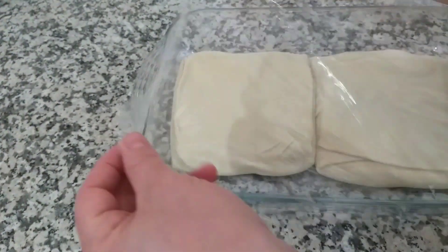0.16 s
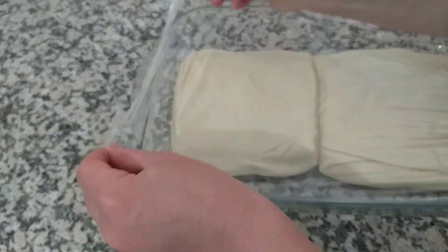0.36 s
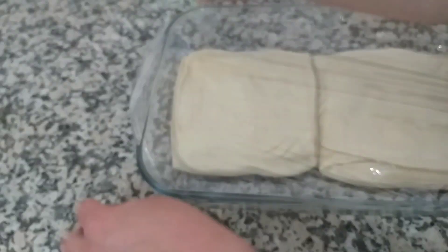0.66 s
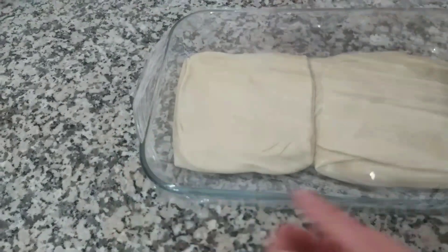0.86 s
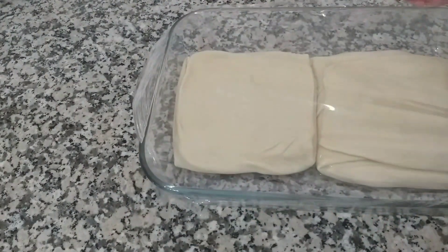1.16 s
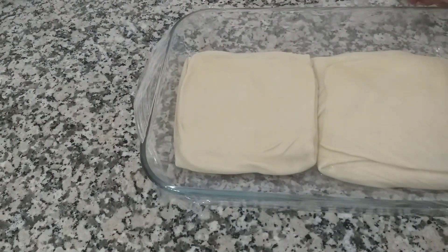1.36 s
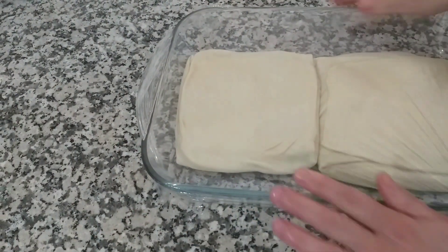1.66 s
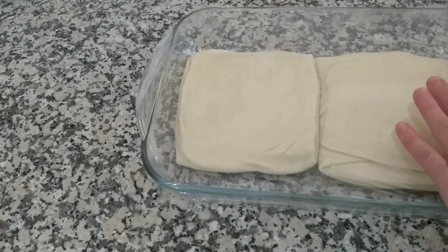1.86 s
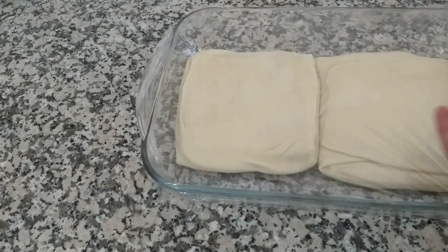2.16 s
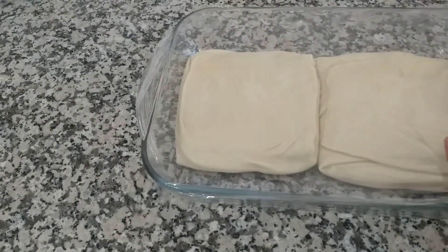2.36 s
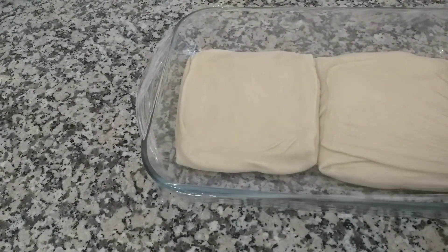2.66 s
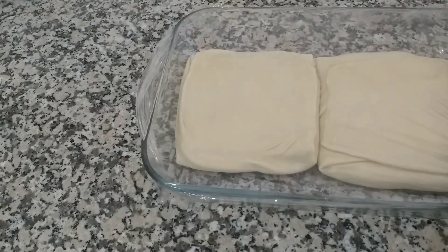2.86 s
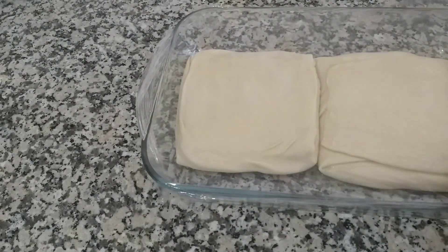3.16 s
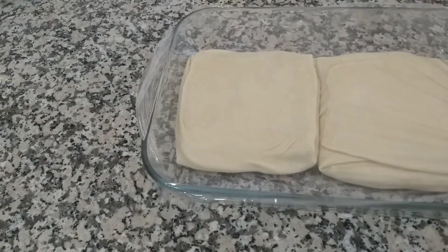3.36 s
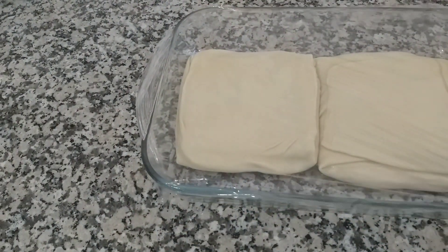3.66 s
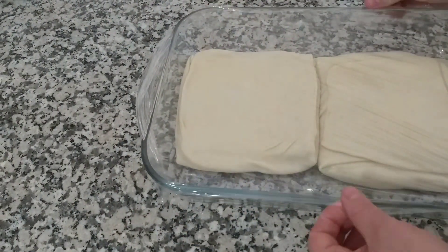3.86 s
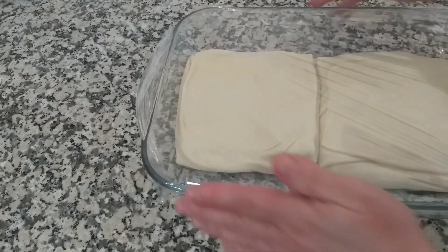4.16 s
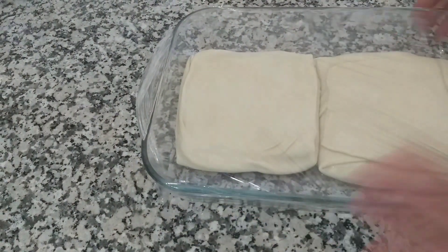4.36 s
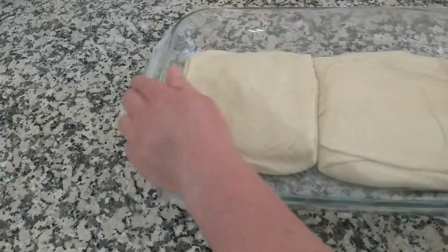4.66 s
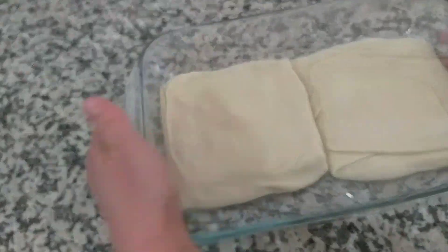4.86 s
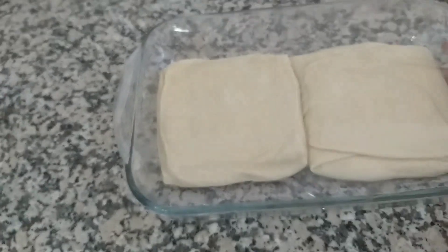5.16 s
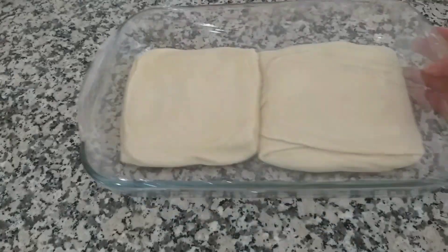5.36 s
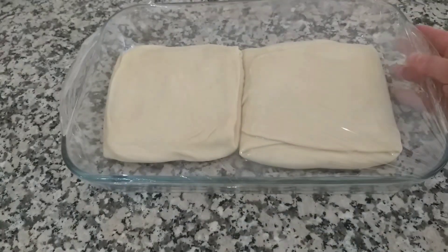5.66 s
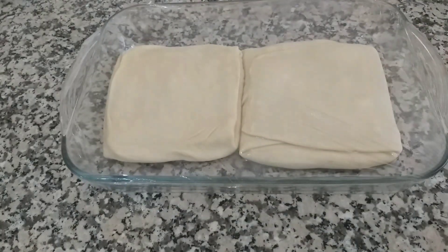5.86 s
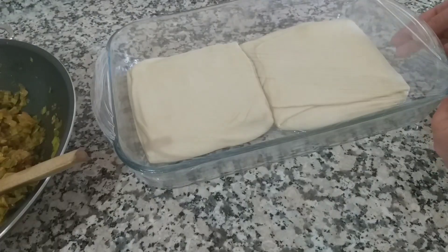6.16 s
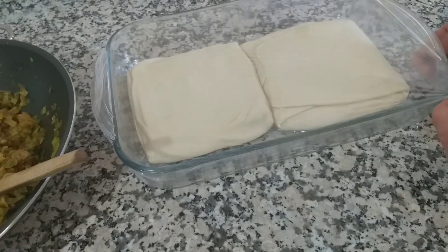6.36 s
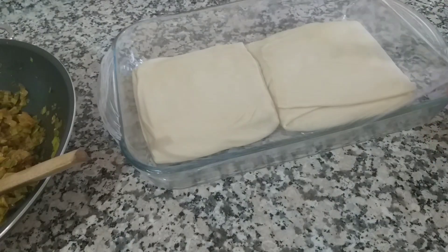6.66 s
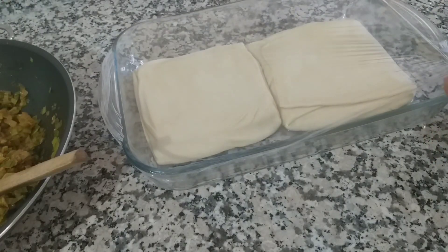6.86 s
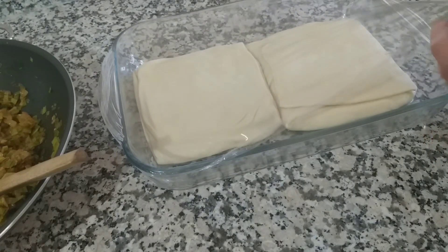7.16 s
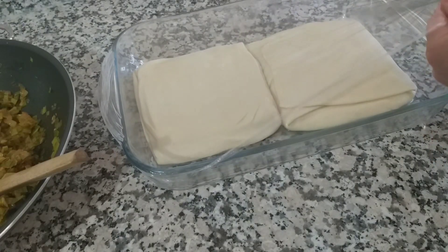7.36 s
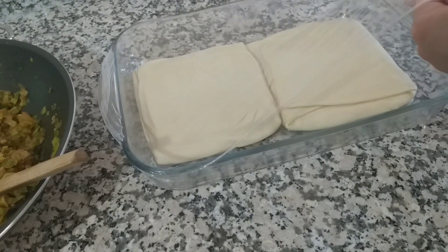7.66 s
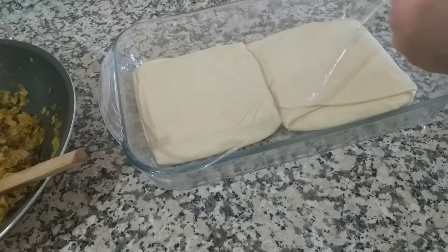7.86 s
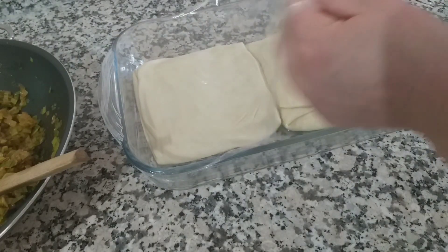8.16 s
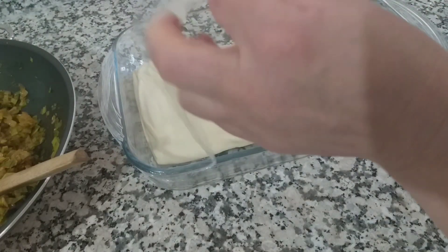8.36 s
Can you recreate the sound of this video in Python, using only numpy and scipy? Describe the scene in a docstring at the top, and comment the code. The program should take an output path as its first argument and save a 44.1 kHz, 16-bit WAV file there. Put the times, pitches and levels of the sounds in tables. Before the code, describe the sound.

Close up in a small quiet kitchen, cling film crackles in short uneven bursts with soft dull pats, sharpest just before three seconds. It thins out to faint ticking, a glass dish slides with a low rumble on stone, then after a tiny dropout two longer pulls crackle brightly over a low hum. Nearly mono, very little echo.

```python
"""A small, quiet kitchen with a stone counter, heard close up and almost in mono: cling film is stretched
over a glass dish of dough and pressed down by hand. Creases buckle as ringing impulses, the sheet rustles
as dense random grains, taut panels and pats sound as damped noise resonances, wipes as swells of crackle.
The dish slides as band-limited friction noise; room air is coloured noise, joined late by a low drone."""
import sys
import numpy as np
from scipy import signal
from scipy.fft import rfft, irfft, next_fast_len
from scipy.io import wavfile
from scipy.ndimage import uniform_filter1d

SR = 44100
rng = np.random.default_rng(int(sys.argv[2]) if len(sys.argv) > 2 else 0)


def master_out(mix):
    """Clip the mix to full scale and print it as 16-bit PCM to the path in sys.argv[1]."""
    frames = np.transpose(np.atleast_2d(mix))
    ceiling = np.clip(frames, -1, 1)
    pcm = np.round(ceiling * 32767).astype(np.int16)
    wavfile.write(sys.argv[1], SR, pcm)


N = 375291
TIME = np.arange(N) / SR
GAP_START, GAP_END = 5.992, 6.026  # s, a short silence
CUTOFF_HZ = 16100


def from_db(db):
    """Level to amplitude: 20 dB is a factor of ten."""
    return 10 ** (np.asarray(db) / 20)


def rms_one(x):
    """Normalisation: scale to an effective value of one."""
    return x / np.sqrt(np.mean(x ** 2) + 1e-20)


def in_time(rows):
    """Linear interpolation: join each column of a curve by straight lines over time."""
    times, *columns = np.transpose(rows)
    return [np.interp(TIME, times, column) for column in columns]


def band(x, low, high, order=2):
    """Band limitation: a Butterworth band-pass filter."""
    return signal.sosfilt(signal.butter(order, [low, high], "band", fs=SR, output="sos"), x)


def peak_at(x, hz, q):
    """Resonance: a narrow band-pass filter of quality factor q."""
    return signal.lfilter(*signal.iirpeak(hz, q, fs=SR), x)


def coloured(x, points, size=2048):
    """Minimum phase: a folded cepstrum turns a magnitude spectrum into a causal filter."""
    hz, db = np.transpose(points)
    grid = np.maximum(np.fft.rfftfreq(size, 1 / SR), 1)
    spectrum = from_db(np.interp(np.log(grid), np.log(hz), db))
    cepstrum = irfft(np.log(spectrum))
    cepstrum[1:size // 2] *= 2
    cepstrum[size // 2 + 1:] = 0
    response = irfft(np.exp(rfft(cepstrum)))
    return signal.fftconvolve(x, response)[:len(x)]


def drift(rate):
    """Random modulation: normal deviates, rate per second, joined by lines and scaled to rms 1."""
    knots = rng.standard_normal(int(N / SR * rate) + 2)
    return rms_one(np.interp(TIME * rate, np.arange(len(knots)), knots))


def add(out, s, sound):
    """Superposition: add a sound that starts at s seconds."""
    start = max(int(s * SR), 0)
    out[start:start + len(sound)] += sound[:N - start]


# room air over time, with a brief dip: t/s, level/dB
AIR_LEVEL = [(0, -72), (2.7, -71), (3.0, -77), (3.3, -73.5), (5.9, -72), (6.1, -70), (8.5, -70)]
# relative spectrum of room air: f/Hz, level/dB
AIR_SPECTRUM = [(18, -36.5), (30, -6), (138, 2.5), (221, -5.5), (632, -12.5), (801, -17.5), (988, -18),
                (1250, -22), (1590, -13.5), (2060, -20.5), (7090, -20.5), (9970, -31), (14400, -24.5),
                (16000, -31.5)]


def room_air():
    """Stationary noise: a fixed spectrum whose level drifts slightly."""
    air = rms_one(coloured(rng.standard_normal(N), AIR_SPECTRUM))
    return from_db(in_time(AIR_LEVEL)[0]) * air


# lines of a low appliance drone: f/Hz, rms level before the common trim/dB
DRONE_LINES = [(70.0, -76), (102.3, -75.5), (134.6, -109.5)]
# relative spectrum of the drone's noise: f/Hz, level/dB
DRONE_SPECTRUM = [(50, -12), (100, -2), (170, -9.5), (300, 14.5), (450, -24), (1000, -6), (3000, -4.5)]


def drone(noise_db=-74, lines_db=-1):
    """Phase modulation: wavering sine lines over low noise, entering with the short silence."""
    sound = from_db(noise_db) * rms_one(coloured(rng.standard_normal(N), DRONE_SPECTRUM))
    for hz, db in DRONE_LINES:
        phase = 2 * np.pi * hz * TIME + .4 * drift(1.8)
        sound += from_db(db + lines_db) * np.sqrt(2) * np.sin(phase)
    return sound * (TIME > GAP_START)


def kitchen(x, wet_db, t60=0.085, wall_hz=6000, delay_s=.004, size=14000):
    """Reverberation: counter, walls and cupboards return a short, duller, exponentially decaying tail."""
    t = TIME[:size]
    build_up = 1 - np.exp(-(t / delay_s) ** 2)
    tail = rng.standard_normal(size) * from_db(-60 * t / t60) * build_up
    tail = signal.lfilter(*signal.butter(1, wall_hz, fs=SR), tail)
    tail /= np.sqrt(np.sum(tail ** 2))
    return x + from_db(wet_db) * signal.fftconvolve(x, tail)[:N]


# the dish slides on the counter: t/s, level of the lower rumble/dB
SLIDE_LEVEL = [(5.12, -83.5), (5.19, -63.5), (5.33, -62), (5.45, -72.5), (5.65, -85), (5.78, -67),
               (5.91, -68.5), (6.02, -94)]


def slide(upper_db=-12, grit_db=-12):
    """Friction excitation: glass on stone rumbles in two low resonances under a faint gritty scrape."""
    friction = rng.standard_normal(N)
    level = from_db(in_time(SLIDE_LEVEL)[0])
    rumble = rms_one(band(friction, 110, 120)) + from_db(upper_db) * rms_one(band(friction, 275, 350))
    # the scrape varies less than the rumble
    smooth_level = uniform_filter1d(level, size=16000)
    scrape = from_db(grit_db) * rms_one(band(friction, 1430, 1900)) * smooth_level
    return level * rumble + scrape


def soft_blows(rows, level_db, rise_s, width, size=12000):
    """Damped resonance: each push is a noise burst in one band; width is the ratio of edge to centre."""
    out, t = np.zeros(N), TIME[:size]
    for s, db, hz, decay in rows:
        push = (1 - np.exp(-t / rise_s)) * np.exp(-t / decay)
        thud = band(rng.standard_normal(size) * push, hz / width, hz * width)
        add(out, s - rise_s, from_db(db + level_db) * thud / np.abs(thud).max())
    return out


# soft pats on film and dish: t/s, peak level before the common trim/dB, f/Hz, decay/s
PAT_BLOWS = [(0.11, -44, 292, 0.028), (1.493, -46, 357, 0.014), (1.613, -47, 120, 0.015),
             (1.844, -43, 354, 0.025), (1.974, -43, 327, 0.027), (2.202, -38.5, 300, 0.027),
             (2.484, -43.5, 238, 0.02), (2.885, -39, 276, 0.013), (3.106, -40, 251, 0.037),
             (3.624, -52.5, 110, 0.028), (3.919, -57, 139, 0.02), (4.303, -49, 127, 0.02),
             (4.614, -58.5, 107.4, 0.034), (6.679, -38, 503.5, 0.018), (7.76, -46, 369, 0.021)]


def pats():
    """Soft impact: a slow contact excites low, broad resonances of film and dish."""
    return soft_blows(PAT_BLOWS, level_db=-1.5, rise_s=0.0049, width=1.35)


# flexing panels of taut film: t/s, peak level before the common trim/dB, f/Hz, decay/s
PANEL_FLEXES = [(0.119, -31, 1860, .012), (0.233, -33.5, 800, 0.0043), (0.795, -48, 790, 0.025),
                (1.44, -38.5, 1540, 0.011), (1.51, -44, 1350, 0.016), (1.74, -46, 990, 0.017),
                (1.838, -37, 860, 0.016), (2.279, -36.5, 1180, 0.0034), (2.62, -48.5, 1040, 0.12),
                (2.696, -25, 936, 0.0088), (2.75, -32, 1000, 0.025), (3.904, -33, 1540, 0.015),
                (4.945, -46, 3700, .02), (5.005, -46.5, 2150, 0.026), (6.519, -25, 1420, 0.0037),
                (6.563, -34, 1230, 0.014), (6.586, -29.5, 900, 0.016), (6.658, -22.5, 1200, 0.0082),
                (6.838, -31, 1250, 0.0075), (7.485, -41.5, 543, 0.05), (8.36, -49.5, 1900, 0.16)]


def flexes():
    """Membrane resonance: a panel of taut film flexes with a hollow note."""
    return soft_blows(PANEL_FLEXES, level_db=-4.5, rise_s=.001, width=1.17)


# clinging spots that let go: t/s, peak level/dB
CLING_RELEASES = [(2.0488, -24), (2.0563, -26), (2.0628, -16.5), (2.3795, -25), (2.696, -22), (3.9197, -26),
                  (5.1353, -35.5), (5.169, -38), (7.5109, -24)]


def unsticks(low_hz=10500, decay_s=0.00054, size=512):
    """Adhesive release: a spot tears loose with a thin, very high click, too small to shake the sheet."""
    out = np.zeros(N)
    for s, db in CLING_RELEASES:
        burst = rng.standard_normal(size) * np.exp(-TIME[:size] / decay_s)
        click = band(burst, low_hz, CUTOFF_HZ)
        add(out, s, from_db(db) * click / np.abs(click).max())
    return out


# body, crackle and sizzle bands of the film: lower f/Hz, upper f/Hz
FILM_BANDS = [(110, 2100), (2450, 9200), (10000, 17000)]
# relative spectrum of the rustling sheet: f/Hz, level/dB
RUSTLE_SPECTRUM = [(80, -20.5), (160, -11.5), (280, -8.5), (550, -8.5), (900, -5), (1700, -6), (2500, -3.5),
                   (4300, 7), (5800, 5.5), (7300, 6), (8500, 0), (9800, -12), (12400, 0), (16000, -4)]


def crackle(per_s, spread_db, friction_db, clump_db):
    """Shot noise: tiny buckles clump over smooth friction; gives body, crackle and sizzle of rms 1."""
    sizes = from_db(spread_db * np.minimum(rng.exponential(1, N), 4)) * rng.choice([-1, 1], N)
    grains = rms_one(sizes * (rng.random(N) < per_s / SR))
    friction = from_db(friction_db) * rng.standard_normal(N)
    clumps = from_db(clump_db * drift(250))
    sheet = coloured((grains + friction) * clumps, RUSTLE_SPECTRUM)
    return [rms_one(band(sheet, *edges, order=4)) for edges in FILM_BANDS]


# quick finger wipes: t at the loudest/s, rise/s, fall/s, crackle level before the common trim/dB,
# body level re crackle/dB, sizzle level re crackle/dB
FINGER_WIPES = [(0.637, 0.014, 0.0083, -46.5, -11, -6), (1.609, 0.0067, 0.022, -48, -0.5, -9.5),
                (2.284, 0.0095, 0.0061, -52, 6, -3), (3.658, 0.013, 0.011, -32.5, -18, -6),
                (3.91, 0.0069, 0.031, -42, -2, -6.5), (4.05, 0.0093, 0.012, -46.5, -13, -5.5),
                (4.181, 0.0088, 0.031, -50.5, -18, -7.5), (4.311, 0.012, 0.014, -51.5, -15, -5.5),
                (4.631, 0.012, 0.025, -58.5, -10, -5), (4.762, 0.02, 0.016, -51.5, -22, -8)]


def wipes(level_db=-2.0, shape=1.54):
    """Sliding contact: film slips along the rim under a finger in a short swell of very dense crackle."""
    out = np.zeros(N)
    body, middle, sizzle = crackle(per_s=5000, spread_db=3, friction_db=0, clump_db=1.5)
    body = rms_one(band(body, 970, 3000))  # film held tight on the rim has no low notes
    for s, rise, fall, db, body_db, sizzle_db in FINGER_WIPES:
        near = np.abs(TIME - s) < .15
        t = TIME[near] - s
        swell = np.exp(-np.abs(t / np.where(t < 0, rise, fall)) ** shape)
        mix = from_db(body_db) * body[near] + middle[near] + from_db(sizzle_db) * sizzle[near]
        out[near] += from_db(db + level_db) * swell * mix
    return out


# faint ticking of the stretched film between strokes: level/dB of body, crackle, sizzle
SETTLING_LEVELS = [-92, -86, -95]
# short tugs and presses: start t/s, length/s, crackle level/dB, swell from start to end/dB,
# body level re crackle/dB, sizzle level re crackle/dB
HAND_STROKES = [(0.018, .09, -53.5, 10, -12.5, -7), (0.102, 0.19, -49.5, 1, -5.5, -4.5),
                (0.357, 0.13, -55.5, 7, -11, -6), (0.494, .09, -65, -7, -5.5, -7),
                (0.704, 0.1, -59.5, -3.5, -11, -8), (0.833, 0.14, -76, -5, 1.5, -12),
                (1.043, 0.15, -63, 9.5, -14, -10), (1.17, 0.072, -66, -3, -10, -9),
                (1.259, 0.14, -50.5, -2.5, -1.5, -6.5), (1.428, 0.033, -52.5, -6, -2, -8),
                (1.479, .015, -51, -1.5, 4, -4), (1.717, .105, -57.5, 9.5, -6, -6),
                (1.828, 0.093, -57, -3, -2.5, -6), (1.961, .115, -54.5, -4.5, 2, -4),
                (2.111, 0.037, -54.5, -2.5, -2, -8.5), (2.193, 0.059, -49, -3, 0.5, -5),
                (2.337, 0.045, -47, 13.5, -13, -0.5), (2.393, 0.1, -57.5, 2, -9.5, -6),
                (2.473, 0.014, -51.5, 3, 10, -5), (2.532, 0.064, -63, -2, -2, -9),
                (2.608, 0.074, -63, 8, -2.5, -14), (2.684, 0.071, -40.5, 7, 0.5, -10),
                (2.788, 0.037, -51, 9, 3.5, -5), (2.875, 0.035, -48, 4, 1, -9),
                (3.053, .03, -58.5, 9.5, -12.5, -8), (3.082, 0.17, -44.5, -4.5, -4.5, -5),
                (3.311, .06, -64, 6, -15, -5), (3.372, 0.092, -55.5, -10, -6.5, -6.5),
                (3.491, 0.032, -62, 2, -5, -7), (3.584, 0.022, -64, 2, -12, -11),
                (3.798, 0.065, -68.5, 3.5, -7, -7), (4.378, 0.09, -50.5, -2, -12, -5.5),
                (4.674, 0.062, -67.5, 2.5, -3.5, -12), (4.798, 0.042, -67.5, -6, 1.5, -16),
                (4.884, 0.12, -54.5, 6.5, -21, -5), (4.991, .075, -58, -15, -5.5, -8),
                (5.073, 0.12, -64.5, 3.5, -15.5, -4), (5.204, 0.056, -67.5, 7.5, 1.5, -17),
                (6.061, .07, -65, 9, -14, -4), (8.156, 0.074, -61, 1, -14, -1.5),
                (8.335, 0.17, -53, -5.5, -15.5, -5)]
# two long pulls peel the film off the rim: t/s, crackle level/dB, body level re crackle/dB,
# sizzle level re crackle/dB
LONG_PULLS = [
    [(6.16, -77.5, -15.5, 3), (6.346, -53, -4, 2.5), (6.5, -53.5, -5, -16), (6.663, -39, 0.5, -8.5),
     (6.777, -54, 3.5, -12), (6.795, -42.5, -8.5, -8), (6.89, -44, 1.5, -8.5), (7.02, -49.5, -4.5, -1.5),
     (7.14, -66, -6, -9), (7.38, -68, -14, -7.5)],
    [(7.4, -68, -16, -4), (7.507, -41.5, -4.5, -8), (7.61, -49, -4, -1), (7.77, -49.5, -7.5, -7),
     (7.87, -66, -2, -16), (8.32, -74, -12.5, -7.5)],
]
ATTACK_S, LEAD_IN_S, RELEASE_DB_PER_S = .009, 0.0037, 540


def handling():
    """Power summation: strokes, pulls and settling add as incoherent gains of body, crackle and sizzle."""
    power = np.outer(from_db(SETTLING_LEVELS) ** 2, np.ones(N))
    for start, length, db, swell_db, body_db, sizzle_db in HAND_STROKES:
        near = (TIME > start - .1) & (TIME < start + length + .2)
        t = TIME[near] - start
        # a stroke creeps in, takes hold, swells or fades, and dies away once the hand stops
        swell = swell_db * (np.clip(t / length, 0, 1) - .5)
        release = RELEASE_DB_PER_S * np.maximum(t - length, 0)
        hold = 1 / (1 + np.exp((ATTACK_S - t) / LEAD_IN_S))
        gain = from_db(db + swell - release) * hold
        power[:, near] += np.outer(from_db([body_db, 0, sizzle_db]), gain) ** 2
    for pull in LONG_PULLS:
        db, body_db, sizzle_db = in_time(pull)
        outside_s = np.abs(TIME - np.clip(TIME, pull[0][0], pull[-1][0]))
        release = RELEASE_DB_PER_S * np.minimum(outside_s, 1)
        power += from_db(np.array([db + body_db, db, db + sizzle_db]) - release) ** 2
    return np.sqrt(power)


def shifting(x, low_hz, high_hz, patchy_db, rate=30, count=9):
    """Varying resonance: panels tighten and slacken, so that their resonances come and go."""
    out = x.copy()
    for hz in np.geomspace(low_hz, high_hz, count):
        gain = rms_one(from_db(patchy_db * drift(rate)))
        out += peak_at(x, hz, 8) * (gain - 1)
    return rms_one(out)


# relative spectrum of single creases, in ticks and snaps: f/Hz, level/dB
CREASE_SPECTRUM = [(80, -25.5), (200, -15), (500, -10), (1500, -5), (2300, -2.5), (3400, 1), (4800, 10),
                   (6200, 3.5), (7600, 5), (8700, -2), (9900, -14.5), (12400, -5.5), (16000, -8.5)]


def ticks(per_s=90, spread_db=7.5):
    """Sparse shot noise: single small creases stand out of the rustle, thin and bright; rms 1."""
    sizes = from_db(spread_db * np.minimum(rng.exponential(1, N), 2.5)) * rng.choice([-1, 1], N)
    impulses = sizes * (rng.random(N) < per_s / SR)
    return rms_one(band(coloured(impulses, CREASE_SPECTRUM), 3500, 17000))


def rustle(body_trim_db=-2.0, crackle_trim_db=-2.0, sizzle_trim_db=-1, ticks_db=-6,
           firm_db=-52, gentle_db=-64, thinning=0.74):
    """Crackling noise: countless small buckles sound as strongly as the hands stir the sheet."""
    body_gain, gain, sizzle_gain = handling()
    body, middle, sizzle = crackle(per_s=1800, spread_db=4, friction_db=-4, clump_db=1.8)
    body = shifting(body, 520, 1800, patchy_db=4)
    middle = shifting(middle, 2700, 7500, patchy_db=3.5)
    # gentle handling moves only the finest creases, so the crackle thins out
    db = 20 * np.log10(gain)
    gentle = thinning * np.clip((db - firm_db) / (gentle_db - firm_db), 0, 1)
    sparse = crackle(per_s=900, spread_db=4, friction_db=-4, clump_db=1.8)[1]
    fine = rms_one(band(sparse, 5500, 8800))
    middle = np.sqrt(1 - gentle) * middle + np.sqrt(gentle) * fine
    bright = from_db(crackle_trim_db) * middle + from_db(ticks_db) * ticks()
    low = body_gain * from_db(body_trim_db) * body
    return low + gain * bright + sizzle_gain * from_db(sizzle_trim_db) * sizzle


# the clearest creases that snap: t/s, crackle level before trim/dB, body level re crackle before trim/dB,
# pitch f/Hz
CREASE_SNAPS = [(0.1174, -26, -5.5, 4230), (0.1463, -27, -6, 7100), (0.1522, -33, -3, 4330),
                (0.187, -38, -25, 5240), (0.4688, -39, -10, 3780), (0.897, -61, 0, 5660),
                (1.107, -45.5, -21, 5150), (1.144, -48.5, -19, 6940), (1.2618, -42.5, -30, 5630),
                (1.2735, -30.5, -5.5, 5630), (1.285, -35, -8, 7700), (1.3035, -39, -15, 6270),
                (1.343, -41, -4, 7400), (1.3503, -32.5, -11, 7400), (1.4428, -46, -22, 5030),
                (1.491, -28.5, -8, 4560), (2.057, -41.5, -29, 7950), (2.1396, -45, -11, 6150),
                (2.367, -33.5, -26, 3420), (2.3757, -37.5, -12, 3330), (2.4231, -46.5, -15, 3900),
                (2.489, -36, -26, 3550), (2.535, -41, -26, 7600), (2.5606, -42, -13, 7860),
                (2.6955, -25.5, -16, 4660), (2.721, -14.5, -5, 3640), (2.8086, -23, -4, 5030),
                (2.823, -25.5, -4, 5460), (2.8843, -33.5, 0.5, 2530), (2.899, -27.5, -8, 5170),
                (3.091, -42.5, -14, 4900), (3.0963, -28.5, -11, 5800), (3.3918, -39, -10, 4600),
                (3.5077, -47, -30, 4930), (3.5175, -50.5, -31, 7200), (3.5649, -55.5, -10, 2800),
                (3.5965, -39.5, -14.5, 2750), (3.649, -32.5, -28, 7130), (3.8383, -50, -17, 4790),
                (3.903, -32, -7.5, 7360), (3.9194, -37.5, -17, 4730), (4.178, -44.5, -21, 5380),
                (5.1703, -49.5, -30, 7150), (5.656, -60, -9, 7450), (6.3209, -40, -13, 5130),
                (6.3344, -35, -14, 4840), (6.35, -36, -11.5, 8700), (6.377, -33.5, -8, 4170),
                (6.418, -46.5, -6, 5600), (6.4812, -42.5, -18, 3800), (6.518, -32, -23, 4850),
                (6.5504, -38, -8, 4400), (6.568, -39.5, -6, 3900), (6.611, -23.5, -3, 4160),
                (6.6594, -24.5, -8, 7000), (6.715, -35.5, -6, 4430), (6.789, -27.5, -7, 4140),
                (6.8076, -34, -4, 4850), (6.8624, -38, -9, 3630), (7.484, -44, -1.5, 4800),
                (7.6353, -41.5, -12, 4200), (7.772, -37.5, -5, 5000)]
# resonances of the taut film over the dish: f/Hz, relative level/dB
TAUT_FILM_MODES = [(540, -8.5), (830, -11), (1085, -1), (1475, -2), (1870, 7.5), (2605, -3.5), (3175, 4),
                   (3545, 9), (3860, -3.5), (4300, 1), (5100, -2), (7040, 3.5), (7760, -10.5)]
# sizzle re crackle of a typical crease, and how it changes with pitch and strength
TYPICAL_SNAP_DB, TYPICAL_SNAP_HZ = -35, 5000
SNAP_SIZZLE_DB, SIZZLE_DB_PER_OCTAVE, SIZZLE_LOSS_PER_DB = -10, 6.0, 0.12


def snaps(crack_s=0.00077, flutter_s=0.0037, flutter_db=-21, crack_db=-8, ring_db=-25, ring_s=0.0023,
          crease_db=6, crease_q=5.7, trims_db=(0, -0.5, 0), size=2048):
    """Buckling: a crease clicks at its own pitch, shakes its neighbours and rings the taut film's modes."""
    out, t = np.zeros(N), TIME[:size]
    mode_hz, mode_db = np.transpose(TAUT_FILM_MODES)
    attack = int(.004 * SR)  # each level is the rms of the first 4 ms
    shake = from_db(crack_db) * np.exp(-t / crack_s) + from_db(flutter_db) * np.exp(-t / flutter_s)
    modes = np.sin(2 * np.pi * np.outer(mode_hz, t)) * np.exp(-t / ring_s)
    for s, db, body_db, hz in CREASE_SNAPS:
        pulse = shake * rng.standard_normal(size)
        pulse[0] = 1
        strengths = from_db(mode_db + ring_db) * rng.standard_normal(len(mode_hz))
        pulse += strengths @ modes
        pulse += from_db(crease_db) * peak_at(pulse, hz, crease_q)
        pulse = coloured(pulse, CREASE_SPECTRUM)
        # high, weak creases sizzle most
        sizzle_db = SNAP_SIZZLE_DB + SIZZLE_DB_PER_OCTAVE * np.log2(hz / TYPICAL_SNAP_HZ)
        sizzle_db -= SIZZLE_LOSS_PER_DB * (db - TYPICAL_SNAP_DB)
        levels_db = (db + body_db, db, db + sizzle_db)
        for edges, level_db, trim_db in zip(FILM_BANDS, levels_db, trims_db):
            part = band(pulse, *edges, order=3)
            attack_rms = np.sqrt(np.mean(part[:attack] ** 2))
            add(out, s, part * from_db(level_db + trim_db) / attack_rms)
    return out


# quadrature part of the side signal: f/Hz, level re the mid signal/dB
SIDE_SPECTRUM = [(30, -17.5), (150, -38), (1000, -43), (1900, -13.5), (3200, -38.5), (6000, -44),
                 (8600, -28.5), (9900, -7.5), (12000, -37)]


def stereo(mid):
    """Mid-side principle: the sound is almost mono; a faint filtered side signal gives it slight width."""
    quadrature = signal.hilbert(coloured(mid, SIDE_SPECTRUM), next_fast_len(N))[:N].imag
    side = quadrature + from_db(-22.5) * band(mid, 1400, 1850)
    # a very faint hiss differs between the channels
    side += from_db(-90.0) * rms_one(band(rng.standard_normal(N), 1400, 2400))
    return np.array([mid + side, mid - side])


def scene():
    """Superposition: film and hands excite the room; slide, air and drone are added without its tail."""
    sharp = kitchen(snaps() + unsticks(), wet_db=-16.5)
    soft = kitchen(rustle() + wipes() + pats() + flexes(), wet_db=-18.5)
    return stereo(room_air() + drone() + slide() + sharp + soft)


def record(dry):
    """Gating and low-pass filtering: the sound drops out for an instant; the top is cut."""
    live = uniform_filter1d(1.0 * ((TIME < GAP_START) | (TIME > GAP_END)), size=128)
    low_pass = signal.ellip(10, .2, 80, CUTOFF_HZ, fs=SR, output="sos")
    return signal.sosfilt(low_pass, dry * live)


dry = scene()
out = record(dry)
master_out(out)
```